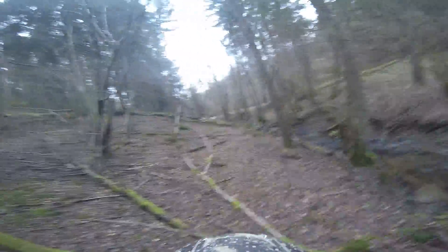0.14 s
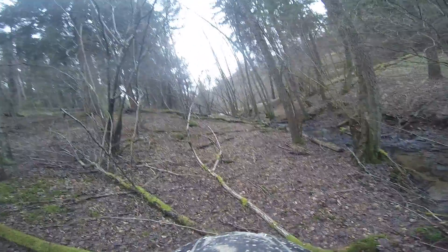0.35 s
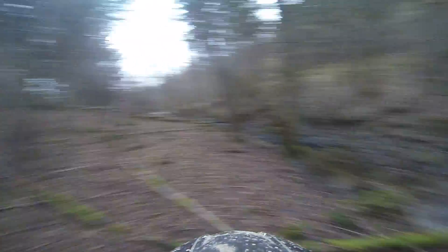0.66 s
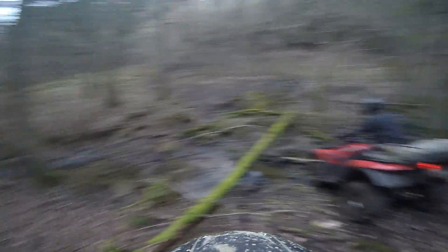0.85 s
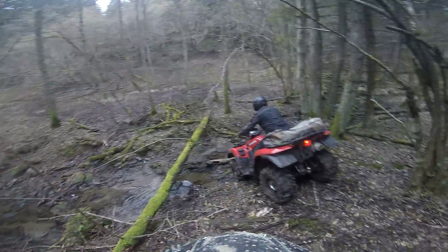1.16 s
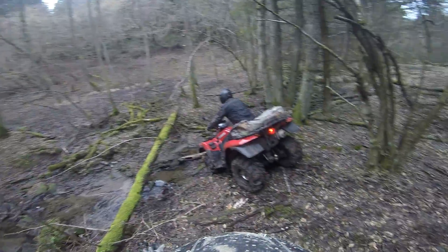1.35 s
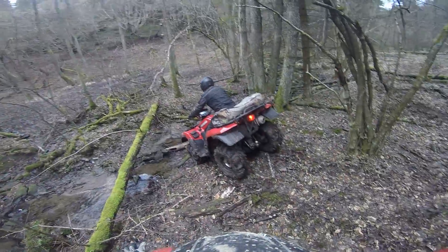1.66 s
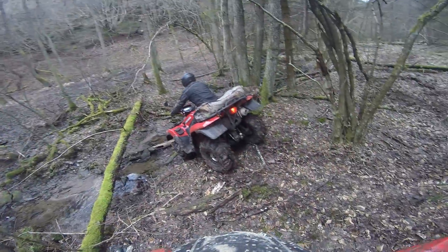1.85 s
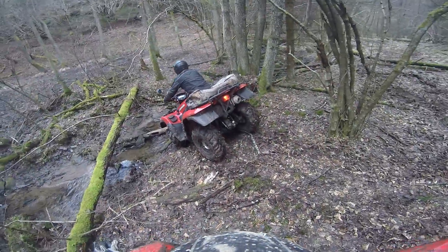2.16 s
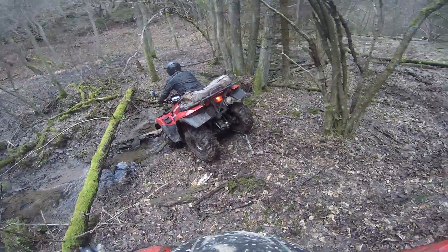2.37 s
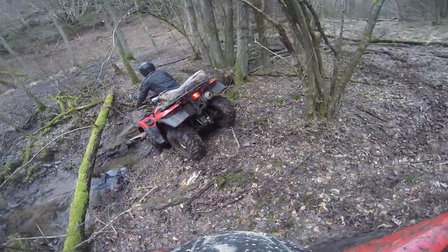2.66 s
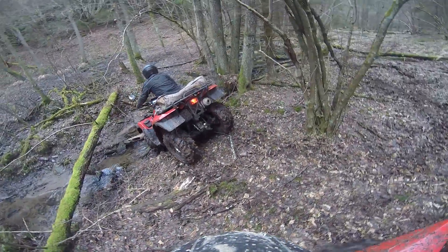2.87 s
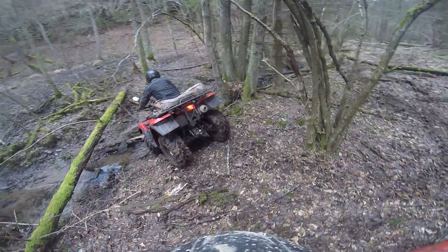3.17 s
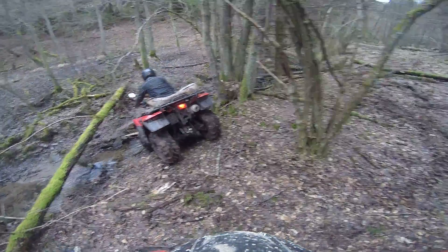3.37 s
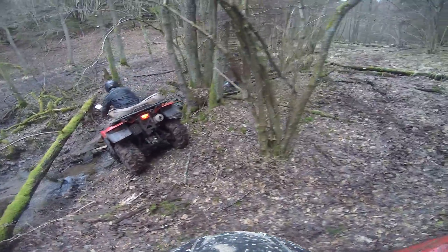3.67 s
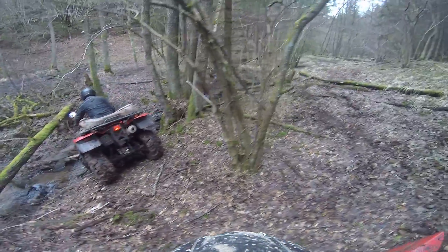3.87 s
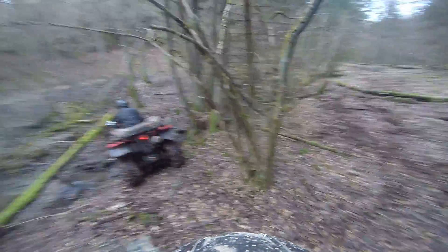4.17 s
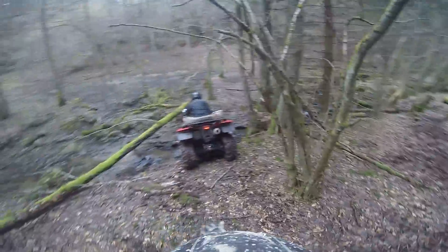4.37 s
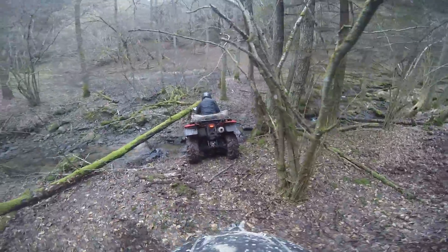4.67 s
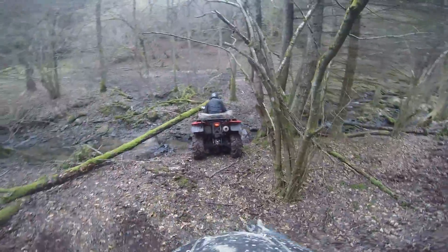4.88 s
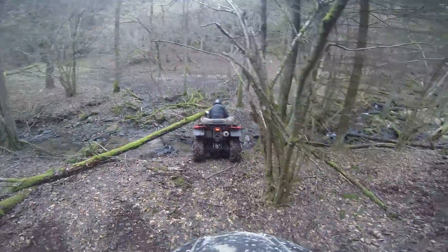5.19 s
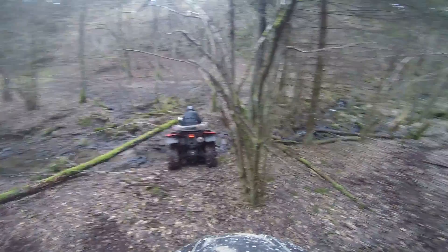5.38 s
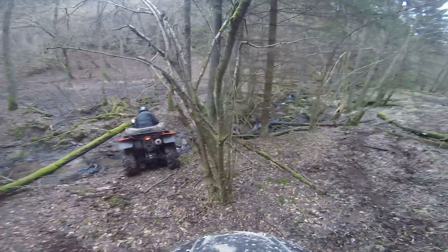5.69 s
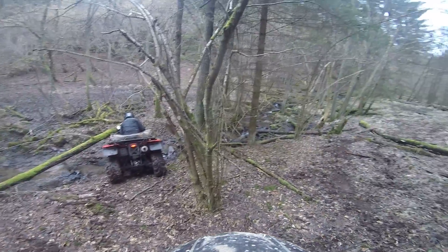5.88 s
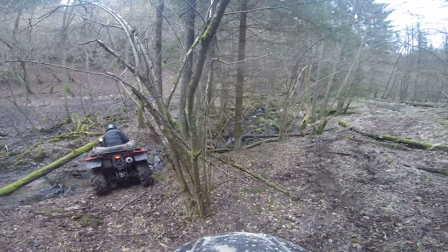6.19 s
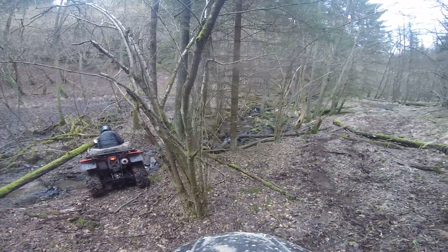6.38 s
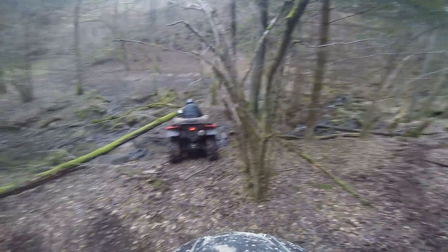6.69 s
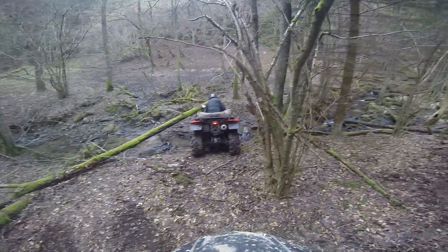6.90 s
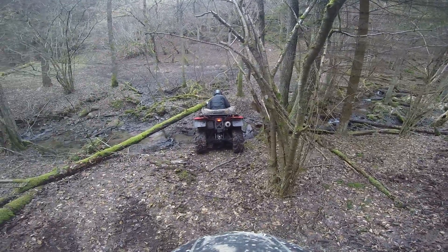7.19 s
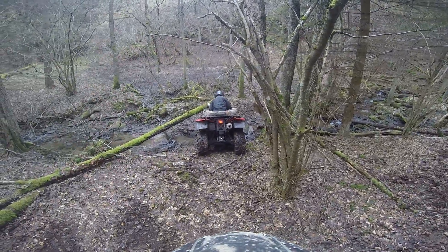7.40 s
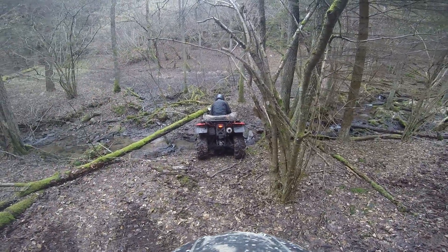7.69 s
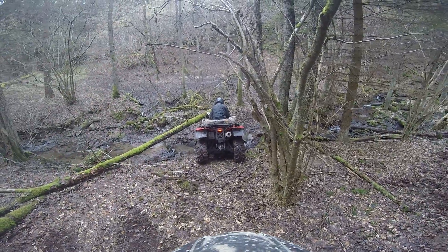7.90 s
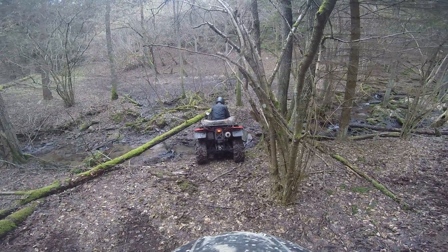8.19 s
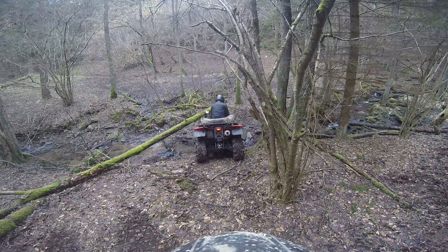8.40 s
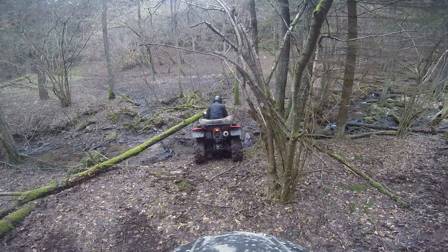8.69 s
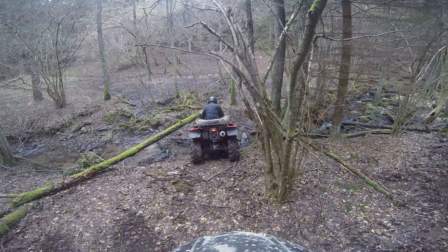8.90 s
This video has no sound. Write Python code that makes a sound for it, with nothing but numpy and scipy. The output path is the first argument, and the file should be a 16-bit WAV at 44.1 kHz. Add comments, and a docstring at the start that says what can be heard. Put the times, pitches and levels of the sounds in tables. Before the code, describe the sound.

Hard hollow plastic clacks over a chugging single-cylinder quad bike that revs up mid-way, then idles amid more rattling; a rasp slows near the end.

```python
"""Loose plastic clacks over an idling single-cylinder quad bike, which revs for a few seconds and idles again.
Each firing puffs through an echoing silencer; piston and valve strokes flutter as noise, the intake gulps.
The rider's helmet camera clacks in its ringing case on rough woodland ground and drones low on a springy mount.
A second quad works ahead, heard as dull exhaust puffs; leaves and twigs crackle under open throttle.
Near the end a ratcheting rasp slows down and stops."""
import sys
import numpy as np
from scipy import signal
from scipy.fft import rfft, irfft, next_fast_len
from scipy.io import wavfile

SR = 44100
rng = np.random.default_rng(int(sys.argv[2]) if len(sys.argv) > 2 else 0)


def put_to_file(sound):
    """Save the sound as 16-bit audio at rate SR, in the file named by the first command-line argument."""
    columns = np.atleast_2d(sound).T  # one column per channel
    safe = np.clip(columns, -1, 1)
    whole_steps = np.round(safe * 32767)
    wavfile.write(sys.argv[1], SR, whole_steps.astype(np.int16))


N = 399105
T = np.arange(N) / SR  # time [s]

# steady outdoor hiss: (frequency [Hz], level [dB])
AIR = [(100, -11), (600, -24), (3000, 6), (6000, -6), (11000, -9.5), (16000, -22)]
# speed and loudness of the quad ahead: (time [s], firing rate [1/s], level [dB])
AHEAD = [(0, 18, -54), (1.5, 27, -34), (1.85, 30.8, -31), (2.2, 18.8, -33), (2.8, 32.7, -33.5),
         (3.25, 35.8, -37), (3.6, 38, -44), (4.4, 33, -58), (6.2, 27.5, -41.5), (9.05, 25.4, -41.5)]
# its dull exhaust colour: (frequency [Hz], level [dB])
AHEAD_PIPE = [(20, 11.5), (60, 2.5), (110, 2.5), (160, -10), (260, -13), (450, -25), (1500, -83)]
# colour of leaves and twigs breaking under the tyres: (frequency [Hz], level [dB])
LITTER = [(500, -26), (1600, 5), (4500, -12.5), (8000, -18), (15000, -31)]
# colour of the ratcheting rasp: (frequency [Hz], level [dB])
RASP = [(700, -14), (980, 18), (1200, -3), (1600, 1.5), (1860, 18), (2350, -18), (2700, 6), (3150, -7),
        (3450, 7), (3750, 9), (4100, -4), (4450, 2), (4800, -12), (5350, -13), (5780, -3), (6100, -13),
        (7450, -9.5), (8000, -17), (14000, -34)]
# the rasp slows at a steady pace
RASP_START_S, RASP_STROKES_PER_S, RASP_SLOWING_PER_S2 = 6.85, 43, 16
RASP_RISE_S, RASP_LENGTH_S, RASP_STOP_S, RASP_DB = 0.19, 1.15, 0.013, -46.5

# plastic rubbing on plastic:
# (time [s], length [s], pitch [Hz], level [dB], bend [share of the pitch])
SQUEAKS = [(0.209, 0.01, 1692, -8.5, -0.003), (1.415, 0.02, 836, -37.5, -0.18),
           (2.544, 0.024, 1090, -31.5, 0.36), (2.562, 0.039, 1290, -26.5, -0.088),
           (4.195, 0.026, 1650, -19, 0.173), (5.423, 0.028, 1210, -27.5, 0.31),
           (5.769, 0.036, 1386, -27, -0.2)]
# the case slides in its mount; the last row is the final tick of the ratcheting rasp: (time [s], length [s],
# level [dB], hollow ring [dB re clack])
SCRAPES = [(0.313, 0.023, -30.5, 23), (0.382, 0.041, -37, 9), (0.56, 0.021, -28, -1),
           (0.584, 0.064, -36, 6), (0.69, 0.015, -28, -27), (0.966, 0.032, -38.5, -4.5),
           (1.14, 0.027, -39, -1), (1.303, 0.029, -25.5, -3), (1.593, 0.038, -33.5, 1),
           (2.561, 0.065, -40, -4), (3.963, 0.022, -29, -23), (4.056, 0.04, -26, 3),
           (4.189, 0.061, -29, -3.5), (4.348, 0.028, -19.5, -8), (4.49, 0.026, -27, -15),
           (4.532, 0.048, -21.5, 1), (4.75, 0.029, -23.5, 11), (5.058, 0.037, -31.5, 1),
           (5.158, 0.019, -37, 4), (5.242, 0.068, -34, -16), (5.39, 0.031, -32, 15),
           (5.432, 0.033, -32.5, 0), (5.775, 0.025, -27.5, -15), (5.994, 0.056, -41.5, 14),
           (7.955, 0.016, -40, -15)]
# knocks of the camera case, levels before the trims in knocks():
# (time [s], clack [dB], hollow ring [dB re clack], sharp edge [dB re clack])
KNOCKS = [(0.0347, -16.5, 4, -31), (0.0738, -25, 7, -32), (0.1661, -8, 4.5, -27), (0.175, -9.5, -13, -34),
          (0.19, -19.5, -1, -40), (0.2, -16.5, 4.5, -48), (0.213, -14, -22, -12.5), (0.223, -21, 1.5, -31),
          (0.277, -25.5, -29, -30), (0.3102, -21, 1, -56), (0.3165, -32, 13.5, -44), (0.322, -32, -2, -20),
          (0.344, -27.5, 4, -39), (0.3975, -28, -2, -41), (0.5193, -27.5, 1.5, -20), (0.539, -10, 0, -47),
          (0.545, -16.5, 2, -40), (0.556, -12, 2.5, -22), (0.697, -16, -19, -46), (0.706, -36, -23, -26),
          (0.991, -37, -2, -12), (1.131, -36.5, -7, -12), (1.1495, -24, 2.5, -25), (1.1808, -35, 8.5, -34),
          (1.308, -24.5, -10, -33), (1.3199, -18.5, -15, -26), (1.3278, -17.5, 1.5, -27),
          (1.347, -26.5, -2, -17), (1.4238, -32.5, -2, -17), (1.5919, -18, 4, -26), (1.656, -25, -6, -29),
          (2.4378, -27.5, -29, -16.5), (2.6065, -19, -5, -32), (3.888, -27, -20, -17),
          (3.9797, -16.5, -35, -28), (3.989, -21.5, 0.5, -49), (4.062, -23.5, -1, -25),
          (4.0763, -19.5, -13, -25), (4.086, -20, 0, -38), (4.094, -27, -8, -7), (4.098, -22, -14, -33),
          (4.2063, -30.5, -23, -12), (4.267, -11, -31, -10.5), (4.306, -20, 0, -19),
          (4.363, -14.5, -6, -25), (4.5175, -26, 3, -39), (4.5417, -23.5, -10, -31),
          (4.5564, -9.5, -11, -25), (4.601, -16, -21, -42), (4.6087, -8, -31, -19.5),
          (4.7438, -26, -8, -27), (4.75, -13, -1, -22.5), (4.8124, -12.5, 7, -42), (4.818, -20, -15, -16),
          (4.854, -19, -6.5, -22), (4.9053, -30.5, 2.5, -15), (4.952, -25, -9.5, -24),
          (5.025, -27.5, -1.5, -23), (5.059, -24, -12, -19), (5.074, -23.5, -16, -26),
          (5.1723, -22, 5.5, -28), (5.195, -13, -15, -16), (5.2204, -28, 8.5, -38), (5.246, -36, 8.5, -36),
          (5.289, -30, 7.5, -33), (5.379, -29, 0.5, -24), (5.4087, -22.5, 6.5, -42),
          (5.4426, -28.5, 9.5, -19), (5.464, -21.5, -4, -31), (5.4982, -24, 6.5, -31),
          (5.529, -27.5, -1, -44), (5.6269, -14, -4, -18), (5.648, -28, -3, -31), (5.6621, -23, -6, -24),
          (5.672, -29, -6, -18), (5.786, -23.5, -20, -34), (5.799, -30, 3, -38), (5.9585, -34, 9.5, -22),
          (5.988, -27.5, 7.5, -46), (6.5042, -23.5, -38, -30), (6.567, -13.5, 0.5, -24.5),
          (6.6117, -20.5, -3, -13.5), (6.6313, -24, -2, -31), (6.672, -32, -7, -22),
          (6.7454, -19, -35, -38), (6.8401, -23, -15, -46), (6.865, -25, -35, -23),
          (6.88, -21.5, -40, -24.5)]
# modes of the case, before each hit varies them: (frequency [Hz], width [Hz], level [dB])
CASE_MODES = [(194, 71, -5), (385, 5.1, -1), (732, 266, 1.5), (830, 840, -11), (946, 63, 5),
              (988, 206, 12.5), (1385, 146, 1), (1813, 160, 6), (1860, 15.4, -3), (2015, 29, -4.5),
              (2070, 125, 4), (2356, 115, -6.5), (2705, 143, -5.5), (3323, 340, -10), (3566, 108, -7.5),
              (4420, 180, -21.5), (4660, 3100, -7.5), (7810, 220, -6.5), (9360, 390, -10.5),
              (12500, 2500, -50)]
# colour of a thud through the mount: (frequency [Hz], level [dB])
THUD = [(25, 9.5), (55, 8), (110, -4.5), (150, -8.5), (230, -15.5), (320, -38), (600, -29.5), (1500, -69)]
# jolts that set the mount swinging, thuds before the trim in thuds():
# (time [s], length of the push [s], swing [dB], thud [dB])
JOLTS = [(0, 0.11, -34, -18), (0.174, 0.035, -8, -2.5), (0.392, 0.048, -16.5, -15),
         (0.604, 0.03, -14.5, -16.5), (0.71, 0.072, -20.5, -48), (0.993, 0.069, -17, -22),
         (1.141, 0.21, -21.5, -25.5), (1.592, 0.023, -15.5, -13.5), (2.635, 0.063, -11.5, -26.5),
         (3.988, 0.024, -12, -6.5), (4.092, 0.056, -15.5, -11), (4.206, 0.06, -13, -10),
         (4.364, 0.066, -12, -11), (4.521, 0.04, -10, -8.5), (4.608, 0.04, -10.5, -12),
         (4.745, 0.0093, -10.5, -14.5), (4.812, 0.023, -16, -7), (4.945, 0.076, -19.5, -18),
         (5.143, 0.058, -13.5, -16.5), (5.286, 0.034, -12, -25), (5.408, 0.028, -20, -7),
         (5.445, 0.023, -12.5, -10), (5.497, 0.061, -13, -34), (5.666, 0.051, -12.5, -16),
         (5.802, 0.078, -14, -15), (5.988, 0.032, -13.5, -35), (6.068, 0.081, -20, -34),
         (6.569, 0.13, -16.5, -20), (6.947, 0.07, -24, -33)]
# a swing builds up, lasts as long as the push, then dies: the shorter the push, the sooner
SWING_RISE_S, SWING_SETTLE_SHARE, SWING_SETTLE_MAX_S = 0.0161, 0.68, 0.054
# the mount is a spring that stiffens as it bends: pitch at rest, and its rise per unit of swing
MOUNT_HZ, STIFFENING_HZ = 32.05, 14

# engine speed: (time [s], firing rate [1/s])
SPEED = [(0, 13.8), (1.27, 13.5), (1.5, 19), (1.7, 24.7), (1.8, 25.57), (2.0, 26.05), (2.28, 25.56),
         (2.47, 26.5), (2.7, 29.12), (2.9, 30.56), (3.1, 31.45), (3.38, 31.55), (3.58, 30.36), (3.92, 30.4),
         (4.2, 30.9), (4.55, 31), (4.8, 17.5), (5, 14.5), (5.85, 13.5), (6.4, 13.7), (6.5, 14.6),
         (8.45, 14.63), (8.6, 15.1), (9.05, 15.3)]
# level ride over the whole engine mix: (time [s], level [dB])
ENGINE_LEVEL = [(0, -42), (0.8, -56.5), (1.64, -43), (2.79, -39.5), (4.23, -38), (5.27, -43), (6.3, -45.5),
                (7.69, -45), (8.09, -46), (9.05, -46)]
FIRING_AT_S = 7.052  # the moment of one firing, which sets the place of all the others
# exhaust colour at idle: (frequency [Hz], level [dB])
IDLE_PIPE = [(15, -20), (30, -12), (60, 7), (105, 0.5), (150, -12.5), (205, -24), (255, -10), (295, -13.5),
             (360, -46), (1500, -52.5)]
# exhaust colour under throttle: (frequency [Hz], level [dB])
OPEN_PIPE = [(20, -10), (60, -4), (90, 10.5), (125, -6.5), (155, -1), (190, -10), (212, -11), (240, -7.5),
             (305, -2.5), (340, -7), (390, -8.5), (450, -3.5), (490, -12), (545, -16), (585, -10.5),
             (620, -20), (660, -1.5), (710, -47), (765, -6), (830, -18), (1500, -57)]
# colour of the engine's mechanical noise, body: (frequency [Hz], level [dB])
CLATTER = [(150, -13.5), (600, -18), (850, -12), (1040, 4.5), (1220, -3.5), (1450, 2.5), (1800, 1),
           (2080, 2.5), (2400, -11), (2760, -5.5), (3020, -27), (4000, -62)]
# colour of the engine's mechanical noise, top end: (frequency [Hz], level [dB])
HISS = [(2600, -7), (3050, -6), (3600, 6.5), (4100, -5.5), (4900, -17.5), (6300, -13), (7500, -16.5),
        (8700, -27), (10300, -19.5), (12000, -35.5), (15000, -33), (16500, -53)]
# piston and valve strokes: (place [share of the engine cycle], level [dB])
STROKES = [(.0, -2), (0.2, 13.5), (0.502, 8.5), (0.782, 3.5)]
# the crank shakes the frame under load: (multiple of the firing rate, level [dB])
SHAKE = [(1, 4), (2, -7.5), (4, -1)]
# how much the hiss and the open exhaust gain on the clatter as the throttle opens
HISS_RISE_DB, EXHAUST_RISE_DB = 2.5, 12
# the whole clatter swells with each gulp; under load loose panels buzz at the firings
SURGE_DB, RATTLE_SHARE, RATTLE_SPREAD_DB, RATTLE_S = 3.4, 0.3, 2, 0.004
# the intake gulps once a cycle through a resonance that sinks during the gulp
GULP_HZ, GULP_WIDTH_HZ, GULP_SINK_HZ = 1470, 260, 111
GULP_DB, GULP_AT_SHARE, GULP_SHARPNESS = -2.5, 0.07, 1.3
# the silencer booms at part throttle: its pitch and width, and the firing rates around which it is woken
BOOM_HZ, BOOM_WIDTH_HZ, BOOM_DB = 265, 68, -2.5
BOOM_FIRINGS_PER_S, BOOM_SPAN_PER_S = 26.92, 2.76
# resonances of the silencer's steel shell, rung under load: (frequency [Hz], level [dB])
SHELL = [(1065, -9), (1435, -8.5)]
SHELL_WIDTH_HZ = 140

EDGE_HZ = 16000  # top of the final band


def amp(db):
    """Decibels to gain."""
    return 10 ** (np.asarray(db) / 20)


def unit(x):
    """Scales to rms 1."""
    return x / np.sqrt(np.mean(x ** 2) + 1e-20)


def curve(rows, axis=1):
    """One column of a table, joined by straight lines in time."""
    rows = np.asarray(rows, float)
    return np.interp(T, rows[:, 0], rows[:, axis])


def colour(points, size):
    """Gain of a spectrum at the bins of an FFT, joined over log frequency."""
    hz, db = np.transpose(points)
    bins = np.fft.rfftfreq(size, 1 / SR)
    return amp(np.interp(np.log(bins + 1), np.log(hz), db))


def tinted(x, points):
    """Filters a sound by a spectrum, to rms 1."""
    size = next_fast_len(len(x) + 4096)
    return unit(irfft(rfft(x, size) * colour(points, size), size)[:len(x)])


def drift(per_s):
    """Random wander of rms 1, with a new target per_s times a second."""
    knots = rng.standard_normal(16000)
    return unit(np.interp(T * per_s, np.arange(len(knots)), knots))


def strikes(turns, spread_db):
    """One click of uneven size at each whole turn."""
    hit = np.diff(np.floor(turns), prepend=np.floor(turns[0])) > 0
    return hit * amp(spread_db * rng.standard_normal(N))


def fading(clicks, decay_s):
    """Each click starts an exponential decay."""
    return signal.lfilter([1], [1, -np.exp(-1 / (SR * decay_s))], clicks)


def add(mix, s, sound):
    """Mixes a sound in at a time."""
    part = mix[max(round(s * SR), 0):][:len(sound)]
    part += sound[:len(part)]


def resonate(x, hz, width_hz):
    """A resonance whose centre follows a curve."""
    turn = np.exp(2j * np.pi * np.cumsum(hz) / SR)
    r = np.exp(-np.pi * width_hz / SR)
    return (turn * signal.lfilter([(1 - r) ** 2], [1, -2 * r, r * r], x / turn)).real


def ringing(firings, hz, width_hz):
    """The firings through one steep resonance, to rms 1."""
    resonance = signal.iirpeak(hz, hz / width_hz, fs=SR)
    once = signal.lfilter(*resonance, firings)
    return unit(signal.lfilter(*resonance, once))


def exhaust(clicks, pipe, smear_s, size=8192):
    """Every firing sends one puff through a silencer whose echoes smear it."""
    t = np.arange(size) / SR
    echoes = np.roll(rng.standard_normal(size) * np.exp(-t / smear_s), size // 4)
    phase = np.angle(rfft(echoes))  # the echoes give the timing, the pipe alone the colour
    puff = irfft(np.exp(1j * phase) * colour(pipe, size)) * signal.windows.tukey(size, .5)
    return unit(signal.fftconvolve(clicks, puff)[size // 4:][:N])


def throttle():
    """Opening of the throttle, 0 at idle to 1, from the engine speed."""
    return np.clip((curve(SPEED) - 16) / 13, 0, 1)


def air(level_db=-65):
    """A steady bed of outdoor hiss, made of coloured noise."""
    return amp(level_db) * tinted(rng.standard_normal(N), AIR)


def quad_ahead():
    """The other machine is heard only by its dull exhaust."""
    firings = strikes(np.cumsum(curve(AHEAD)) / SR, spread_db=1)
    return exhaust(firings, AHEAD_PIPE, smear_s=0.031) * amp(curve(AHEAD, axis=2))


def litter(per_s=35, crack_s=0.003, level_db=-50):
    """Leaves and twigs crackle under the tyres while the throttle is open."""
    sizes = amp(3.5 * np.minimum(rng.exponential(1, N), 2))
    cracks = (rng.random(N) < per_s / SR) * sizes
    crackle = tinted(fading(cracks, crack_s) * rng.standard_normal(N), LITTER)
    return amp(level_db) * throttle() * crackle


def rasp(stroke_s=0.0044):
    """Short noisy scrapes that come ever more slowly, then stop."""
    t = T - RASP_START_S
    running = t > 0
    rate = (RASP_STROKES_PER_S - RASP_SLOWING_PER_S2 * t) * running
    clicks = strikes(np.cumsum(rate) / SR, spread_db=1)
    strokes = fading(fading(clicks, stroke_s), stroke_s)
    envelope = np.clip(np.minimum(t / RASP_RISE_S, (RASP_LENGTH_S - t) / RASP_STOP_S), 0, 1)
    grating = tinted(strokes * rng.standard_normal(N), RASP)
    # the silence before the start must not raise the level
    return np.sqrt(running.mean()) * grating * amp(RASP_DB) * envelope


def squeaks(jitter=0.032, jitter_per_s=350, rough_db=3, octave_db=-7):
    """Plastic sticks and slips at an unsteady bending pitch, with an octave overtone when pressed hard."""
    out = np.zeros(N)
    waver = 1 + jitter * drift(jitter_per_s)
    rough = amp(rough_db * drift(jitter_per_s))
    for s, length, hz, db, bend in SQUEAKS:
        during = (T >= s) & (T < s + length)
        pitch = hz * (1 + bend * ((T[during] - s) / length - .5)) * waver[during]
        angle = 2 * np.pi * np.cumsum(pitch) / SR
        overtone = amp(octave_db + db / 2) * np.sin(2 * angle)
        rub = (np.sin(angle) + overtone) * rough[during]
        add(out, s, amp(db) * unit(rub * signal.windows.hann(len(rub))))
    return out


def swing_size():
    """How widely the mount swings: attack, hold and release at each jolt."""
    power = np.zeros(N)
    t = np.arange(SR // 2) / SR
    for s, length, db, _ in JOLTS:
        settle_s = min(SWING_SETTLE_SHARE * length, SWING_SETTLE_MAX_S)
        attack = np.minimum(t / SWING_RISE_S, 1)
        release = np.exp(-np.maximum(t - length, 0) / settle_s)
        add(power, s, (amp(db) * attack * release) ** 2)
    return np.sqrt(power)


def wobble(rumble_db=-14, tremble_db=-30, waver=0.025):
    """The camera swings on its springy mount at each jolt and trembles under throttle, with a little rumble."""
    size = np.hypot(swing_size(), amp(tremble_db) * throttle())
    hz = (MOUNT_HZ + STIFFENING_HZ * size) * (1 + waver * drift(22))
    swing = np.sin(2 * np.pi * np.cumsum(hz) / SR)
    rumble = amp(rumble_db) * tinted(rng.standard_normal(N), THUD)
    return size * (unit(swing) + rumble)


def thuds(jolt_db=-4, knock_db=-19, follow=0.36, hollow_follow=0.48, rise_s=0.003, thud_s=0.027, size=4096):
    """Dull pushes through the mount: one per jolt, a lighter one under each knock, most when hollow."""
    t, out = np.arange(size) / SR, np.zeros(N)
    pushes = [(s, jolt_db + db) for s, _, _, db in JOLTS]
    pushes += [(s, knock_db + follow * db + hollow_follow * hollow) for s, db, hollow, _ in KNOCKS]
    envelope = np.exp(-t / thud_s) * (1 - np.exp(-t / rise_s))
    for s, db in pushes:
        low = tinted(rng.standard_normal(size), THUD) * envelope
        add(out, s, amp(db) * low / np.sqrt(np.mean(low[:SR // 50] ** 2)))  # level over the first 20 ms
    return out


def case_rings(bright_db, detune=0.063, uneven_db=2.0, size=2048):
    """Case modes ring in three groups (hollow, clack, edge), each spot differently; bright_db lifts upper clack."""
    t = np.arange(size) / SR
    rings = np.zeros((3, size))
    spots = rng.standard_normal((len(CASE_MODES), 2))
    for k, ((hz, width, db), (shift, strength)) in enumerate(zip(CASE_MODES, spots)):
        group = int(hz > 1200) + int(hz > 4500)
        tone = np.sin(2 * np.pi * (hz + shift * min(detune * hz, width / 2)) * t)
        upper = 2500 < hz < 4500
        gain = (-1) ** k * amp(db + upper * bright_db + uneven_db * strength) * width
        rings[group] += gain * np.exp(-np.pi * width * t) * tone
    rings[0] = signal.lfilter(*signal.butter(2, 1600, fs=SR), rings[0])
    rings[1] = signal.lfilter(*signal.butter(5, 4900, fs=SR), rings[1])
    return rings


def chatter(per_s=250, level_db=-19.0, hollow_db=-1, edge_db=-26, spread_db=4, follow=0.98,
            settle_s=0.013, rise_s=0.0065, swing_db=-22):
    """After each knock, and while the mount swings, the loose case keeps ticking faintly."""
    blows = np.zeros(N)
    for s, db, *_ in KNOCKS:
        add(blows, s, amp([2 * follow * db]))  # as power
    knock_shake = np.sqrt(fading(fading(blows, settle_s), rise_s) / (rise_s * SR))
    shake = np.hypot(knock_shake, amp(swing_db) * swing_size())
    ticks = (rng.random(N) < per_s / SR) * rng.choice([-1, 1], N)
    ticks = ticks * amp(spread_db * np.minimum(rng.exponential(1, N), 3))
    ring = amp([hollow_db, 0, edge_db]) @ np.array([unit(r) for r in case_rings(bright_db=2)])
    return amp(level_db) * shake * unit(signal.fftconvolve(ticks, ring)[:N])


def scrapes(slips_per_s=900, spread_db=4, edge_db=-26, size=8192):
    """The case sticks and slips: a cluster of tiny blows that swells and fades."""
    t, out = np.arange(size) / SR, np.zeros(N)
    for s, length, db, hollow in SCRAPES:
        swell = np.sqrt(np.maximum(np.sin(np.pi * np.minimum(t / length, 1)), 0))
        slips = (rng.random(size) < slips_per_s / SR) * rng.choice([-1, 1], size)
        slips = slips * amp(spread_db * rng.standard_normal(size))
        parts = signal.fftconvolve(case_rings(bright_db=2.5), (slips * swell)[None], axes=1)[:, :size]
        sound = amp([hollow, 0, edge_db]) @ np.array([unit(p) for p in parts])
        add(out, s, amp(db) * unit(sound) * np.sqrt(length * SR / size))  # level over the scrape's own length
    return out


def knocks(contact_s=0.0011, buzz=0.14, buzz_s=0.006, scrape=0.047, scrape_s=0.034, clack_db=1,
           hollow_db=-3, edge_db=-3, bright_per_edge=0.3, dull_per_hollow=0.19, size=2048):
    """Loose plastic scrapes, hits and buzzes, ringing the case."""
    lead = SR // 100  # room for the slide before the hit
    t, out = (np.arange(size) - lead) / SR, np.zeros(N)
    after = np.maximum(t, 0)
    hit = (t >= 0) * (np.exp(-after / contact_s) + buzz * np.exp(-after / buzz_s))
    slide = (t < 0) * scrape * np.exp(-abs(t) / scrape_s)
    for s, db, hollow, edge in KNOCKS:
        grit = rng.standard_normal(size)
        glancing = min(amp(2.8 * (edge + 25.5)), 1)  # a glancing blow has a sharper edge and slides before it hits
        force = grit ** 3 / 2 * (hit + glancing * slide)
        force[lead] += 4  # the first contact
        bright_db = bright_per_edge * (edge + 25) - dull_per_hollow * max(hollow + 8, 0)
        parts = signal.fftconvolve(case_rings(bright_db), force[None], axes=1)[:, :size]
        onset = parts[:, lead:][:, :SR // 167]  # the first 6 ms set the level
        parts /= np.sqrt(np.mean(onset ** 2, 1, keepdims=True))
        ring = amp(db + np.array([hollow + hollow_db, clack_db, edge + edge_db])) @ parts
        add(out, s - lead / SR, ring * signal.windows.tukey(size, .3))
    return out


def chug(turns, depth):
    """Under load the beat limps: every other engine cycle is stronger. Keeps the power."""
    swing = np.clip(depth, 0, 1) * throttle()
    return (1 + swing * np.cos(np.pi * turns)) / np.sqrt(1 + swing ** 2 / 2)


def rattle(turns, grain_db=4):
    """Under load the firings shake loose panels into short, gritty buzzes, most on every other cycle."""
    shakes = strikes(turns, RATTLE_SPREAD_DB) * chug(turns, 0.31)
    buzz = fading(fading(shakes, RATTLE_S), RATTLE_S) * amp(grain_db * drift(900))
    return RATTLE_SHARE * throttle() * unit(buzz)


def gulps(turns, load_drop_db=4):
    """Air rushes into the intake once in every cycle, a rounded chuff that is clearest at idle."""
    angle = 2 * np.pi * (turns - GULP_AT_SHARE)
    rush = np.exp(GULP_SHARPNESS * np.cos(angle)) * amp(1.2 * drift(15)) * rng.standard_normal(N)
    chuff = unit(resonate(rush, GULP_HZ - GULP_SINK_HZ * np.sin(angle), GULP_WIDTH_HZ))
    return amp(GULP_DB - load_drop_db * throttle()) * chuff


def boom(firings):
    """Firings ring the silencer: its chamber at middling engine speed, its shell at open throttle."""
    woken = np.exp(-((curve(SPEED) - BOOM_FIRINGS_PER_S) / BOOM_SPAN_PER_S) ** 2 / 2)
    chamber = amp(BOOM_DB) * woken * ringing(firings, BOOM_HZ, BOOM_WIDTH_HZ)
    shell = sum(amp(db) * ringing(firings, hz, SHELL_WIDTH_HZ) for hz, db in SHELL)
    return chamber + throttle() ** 2 * shell


def exhaust_pipe(firings, load, idle_db=3.5, open_db=-13.0, gas_db=-14, open_gas_db=-17):
    """Idle puffs give way to open-throttle puffs, each with a burst of gas noise at the firings."""
    pipe = amp(idle_db) * (1 - load) ** 2 * exhaust(firings, IDLE_PIPE, smear_s=0.012)
    pipe += amp(open_db + EXHAUST_RISE_DB * load) * load * exhaust(firings, OPEN_PIPE, smear_s=0.015)
    gas = fading(firings, decay_s=0.032) * rng.standard_normal(N)
    pipe += amp(gas_db) * tinted(gas, IDLE_PIPE)
    open_gas = fading(firings, decay_s=0.015) * rng.standard_normal(N)
    pipe += amp(open_gas_db) * load * tinted(open_gas, OPEN_PIPE)
    return pipe


def frame_shake(turns, load):
    """The crank shakes the frame under load, as unsteady low tones locked to the firings."""
    tones = sum(amp(db) * unit(np.sin(2 * np.pi * round(k) * turns)) for k, db in SHAKE)
    return np.sqrt(load) * amp(3.2 * drift(16)) * tones


def mechanical_noise(turns, load, steady, clatter_db=1.0, hiss_db=-9, stroke_s=0.01, hiss_wash=0.17,
                     flutter_db=0.5, flutter_per_s=220):
    """Piston and valve strokes burst into fluttering clatter and hiss that swell with each gulp."""
    strokes = sum(amp(db) * strikes(turns - share, spread_db=1.3) for share, db in STROKES)
    beat = unit(fading(fading(strokes * steady, stroke_s), stroke_s) / (1 + 0.27 * load))
    wash = .25 + rattle(turns)  # noise between the strokes
    flutter = unit(amp(flutter_db * drift(flutter_per_s)))
    clatter = amp(clatter_db) * tinted((beat + wash) * flutter * rng.standard_normal(N), CLATTER)
    hiss = amp(hiss_db) * tinted((beat + wash + hiss_wash) * flutter * rng.standard_normal(N), HISS)
    surge = amp(SURGE_DB * (1 - load / 2) * np.cos(2 * np.pi * (turns - GULP_AT_SHARE)))
    return surge * (clatter + hiss * amp(HISS_RISE_DB * load))


def engine(pipe_limp=0.045, clatter_limp=0.043):
    """One turning cycle drives exhaust puffs, intake gulps, mechanical noise, frame shake and silencer boom."""
    rate = curve(SPEED)
    turns = np.cumsum(rate) / SR + .0035 * drift(12)  # engine cycles, slightly unsteady
    turns -= np.interp(FIRING_AT_S, T, turns)
    load = throttle()
    steady = np.sqrt(rate.mean() / rate)  # loudness is set by the level curve, whatever the speed
    firings = strikes(turns, spread_db=1) * steady * chug(turns, pipe_limp)
    noise = (gulps(turns) + mechanical_noise(turns, load, steady)) * chug(turns, clatter_limp)
    mix = noise + exhaust_pipe(firings, load) + frame_shake(turns, load) + boom(firings)
    return amp(curve(ENGINE_LEVEL)) * mix


def scene():
    """Both machines, the shaking camera and the wood, in mono."""
    background = air() + quad_ahead() + litter() + rasp()
    camera = squeaks() + wobble() + thuds() + chatter() + scrapes() + knocks()
    return (background + camera + engine())[None]


def record(dry):
    """The deepest bass is cut away, the input overloads on the hardest knocks; then the band limit."""
    dry = signal.lfilter(*signal.butter(2, 12, "high", fs=SR), dry)
    clipped = dry / (1 + (dry / .97) ** 8) ** (1 / 8)
    low_pass = signal.firwin(255, EDGE_HZ, window=("kaiser", 9), fs=SR)
    return signal.oaconvolve(clipped, low_pass[None], "same")


dry = scene()
out = record(dry)
put_to_file(out)
```